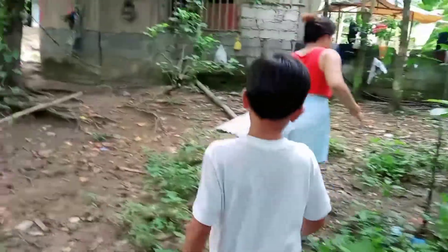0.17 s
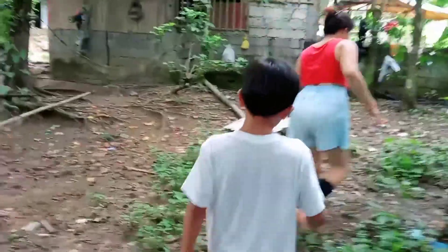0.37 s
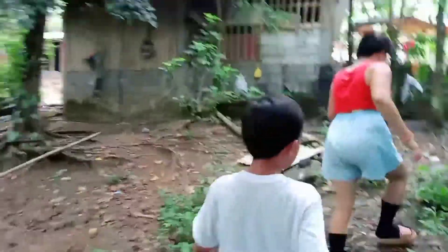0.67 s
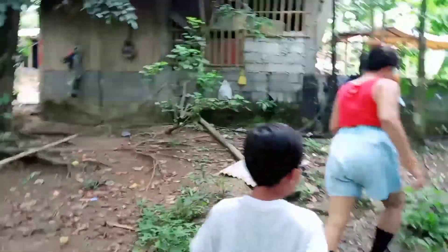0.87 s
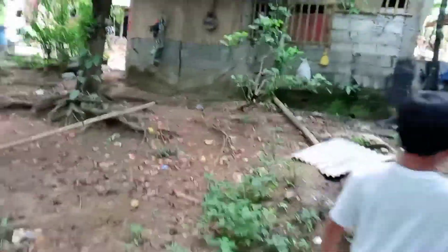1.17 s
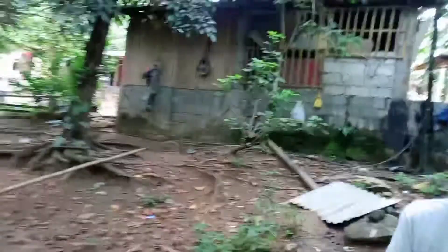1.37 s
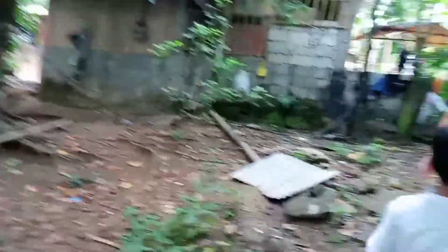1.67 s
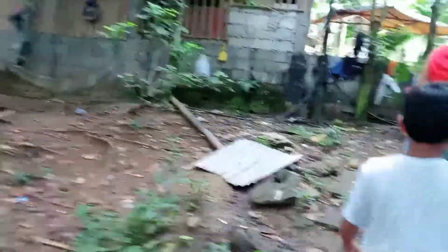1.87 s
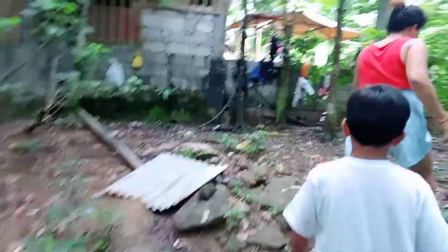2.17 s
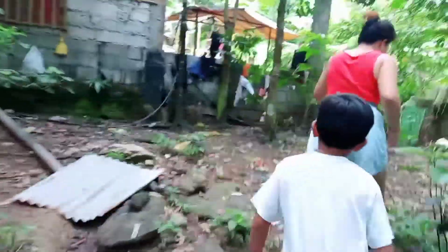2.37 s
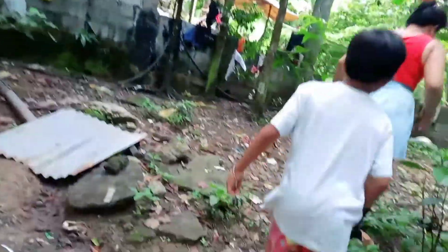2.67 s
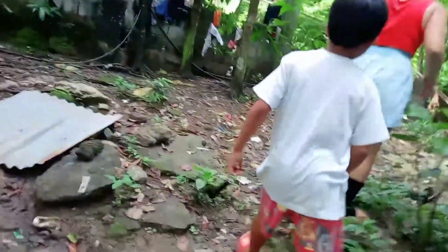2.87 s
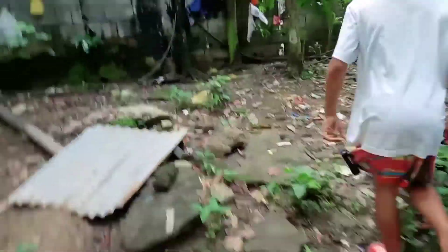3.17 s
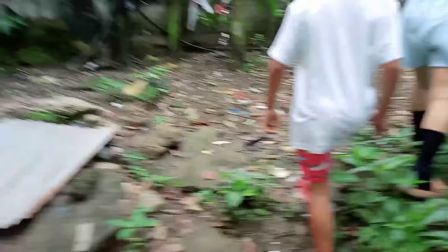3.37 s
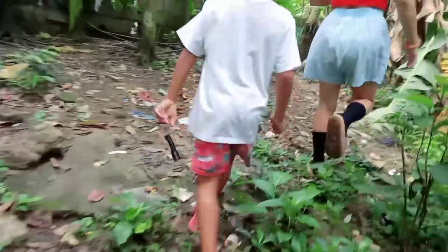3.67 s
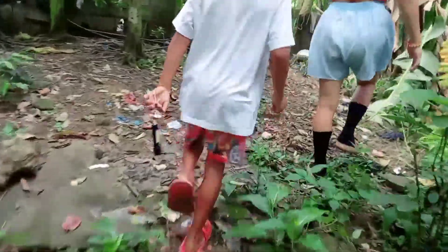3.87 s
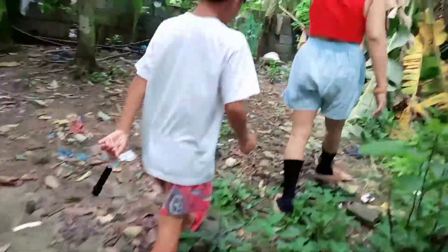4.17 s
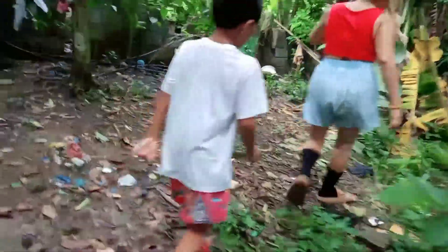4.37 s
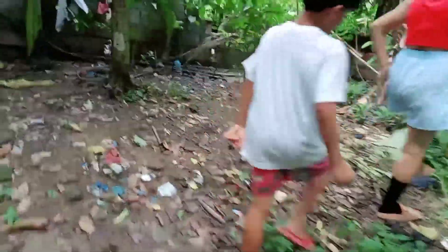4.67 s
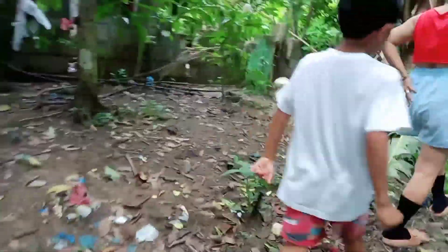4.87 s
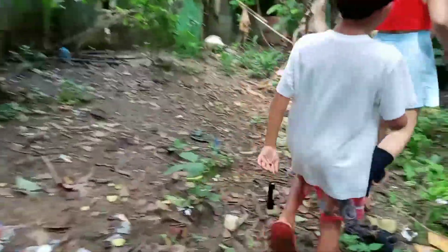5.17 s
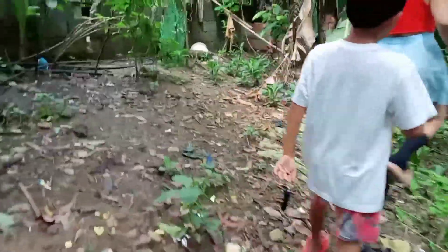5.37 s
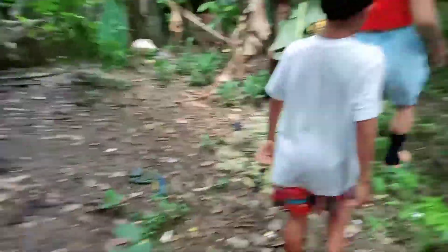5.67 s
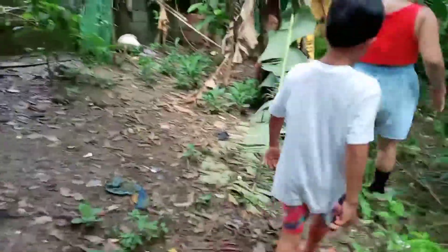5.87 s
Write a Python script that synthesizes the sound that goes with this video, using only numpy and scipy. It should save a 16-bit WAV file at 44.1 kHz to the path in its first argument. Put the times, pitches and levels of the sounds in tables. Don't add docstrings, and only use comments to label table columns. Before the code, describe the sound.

In a leafy rural yard, a close rooster opens with a loud, raspy four-part crow that falls away before two seconds. Feet shuffle through dry leaves, with a sharp twig snap early on. Thin distant fowl whistles follow, then two farther roosters answer, hoarse then clear. Steps and small snaps continue to the end. A handheld, nearly mono microphone adds light hiss.

```python
import sys
import numpy as np
from scipy import signal
from scipy.io import wavfile
from scipy.ndimage import uniform_filter1d

SR = 44100
rng = np.random.default_rng(int(sys.argv[2]) if len(sys.argv) > 2 else 0)


def makeup_ratio(level_db):
    decades = np.asarray(level_db, float) / 20
    return 10 ** decades


def pcm_store(signal):
    levels = np.round(np.clip(np.atleast_2d(signal), -1, 1) * 32767)
    wavfile.write(sys.argv[1], SR, levels.astype(np.int16).T)


N = 264820


def evened(x):
    return x / np.sqrt(np.mean(x ** 2) + 1e-20)


def curve(rows):
    s, *columns = np.transpose(rows)
    return [np.interp(np.arange(N) / SR, s, c) for c in columns]


def read(points, hz):
    f, value = np.transpose(points)
    return np.interp(np.log(hz + 1), np.log(f + 1), value)


def drift(length, hz):
    low_pass = signal.butter(2, hz, fs=SR, output="sos")
    settled = signal.sosfilt(low_pass, rng.standard_normal(length + 4000))[4000:]
    return evened(settled)


def resonate(x, hz, width_hz):
    turn = np.exp(2j * np.pi * np.cumsum(hz * np.ones(len(x))) / SR)
    r = np.exp(-np.pi * width_hz / SR)
    return 2 * (turn * signal.lfilter([(1 - r) ** 2], [1, -2 * r, r * r], x / turn)).real


def noise(points, patchy_db):
    hz = np.fft.rfftfreq(1024, 1 / SR)
    a, b, patches = rng.standard_normal((N // 256 + 5, 513, 3)).T
    patches = uniform_filter1d(uniform_filter1d(patches, 14, 0), 14, 1)
    level_db = read(points, hz)[:, None] + patchy_db * evened(patches)
    return evened(signal.istft((a + 1j * b) * makeup_ratio(level_db), nperseg=1024, noverlap=768)[1][:N])


def add(mix, s, sound):
    part = mix[round(s * SR):][:len(sound)]
    part += sound[:len(part)]


def call(rows, orders, wobble, flutter_db):
    s, *columns = np.transpose(rows)
    t = np.arange(s[0], s[-1], 1 / SR)
    hz, *levels_db = (np.interp(t, s, c) for c in columns)
    turns = np.cumsum(hz * (1 + wobble * drift(len(t), 44.0))) / SR
    tone = np.zeros(len(t))
    for order, db in zip(orders, levels_db):
        tone += makeup_ratio(db + flutter_db * drift(len(t), 60.4)) * np.cos(2 * np.pi * order * turns)
    return s[0], np.sqrt(2) * tone * signal.windows.tukey(len(t), .1)


def with_partial(rows, db):
    return np.column_stack([rows, np.array(rows)[:, -1] + db])


def sung(rows, pitch):
    s = np.linspace(rows[0][0], rows[-1][0], num=80)
    at, *levels_db = np.transpose(rows)
    return np.transpose([s, np.interp(s, *np.transpose(pitch))] + [np.interp(s, at, db) for db in levels_db])


def note(start, length, first_hz, last_hz, db, shape):
    attack_s, release_s, ends_db = shape
    u = np.linspace(0, 1, num=40)
    s, hz = start + length * u, first_hz + (last_hz - first_hz) * u
    swell = np.clip(np.minimum((s - start) / attack_s, (start + length - s) / release_s), 0, 1)
    return np.transpose([s, hz, db + ends_db * (1 - swell)])


# t/s, level/dB, beak opening 0-1
CROW = [
    [(0, -35, 1), (.026, -34.5, 1), (.04, -71, 0.9), (.068, -66, .5)],
    [(.074, -38.5, 0), (.108, -30, 0.3), (.198, -31.5, 0.73), (.262, -44, 0.9)],
    [(.272, -33, 0.36), (.34, -25, 0.3), (.398, -27.5, 1), (.46, -24.5, 0.63), (.53, -24.5, 0.75),
     (.6, -26, 0.85), (.655, -37, 1), (.765, -53.5, 1)],
    [(.778, -47, 0.3), (.809, -32.5, 0.6), (.885, -27.5, 0.2), (.93, -27.5, 0.38), (1.05, -26.5, 0.54),
     (1.15, -29, 0.44), (1.27, -32, 0.62), (1.345, -28.5, 0.26)],
    [(1.36, -36, 0.9), (1.45, -40, 0.1), (1.525, -47, 0), (1.563, -39, 0.3), (1.593, -41.5, 0.8),
     (1.625, -37.5, 0.7), (1.69, -43.5, 0), (1.76, -53, 0.1), (1.82, -50, .6)],
]
# t/s, f/Hz
BEAK_HZ = [(0, 3160), (.1, 3270), (.26, 3350), (.33, 3220), (.47, 3360), (.62, 3305), (.82, 3110),
           (1.0, 3200), (1.2, 3150), (1.36, 3195), (1.7, 3250)]
# f/beak resonance, width/Hz, level/dB
LOW_THROAT = [(767, 223, 13), (1022, 460, 8), (572, 60, -8)]
MID_THROAT = [(1620, 320, -1), (2004, 295, 4.5)]
HIGH_THROAT = [(1, 140, 12), (1.0, 534, 8.5), (2.03, 447, -2.5), (1.87, 250, -9), (2.12, 250, -8.5),
               (2.45, 645, -7.5), (3.2, 1620, -6)]
# t/s, f/Hz
LOWER_HZ = [(.07, 753), (.26, 738), (.275, 752), (.645, 752), (.8, 738), (.94, 728), (1.36, 712)]
UPPER_HZ = [(.09, 941), (.27, 929), (.3, 955), (.53, 972), (.58, 995), (.64, 990), (.79, 970), (.97, 962),
            (1, 985), (1.19, 985), (1.35, 940)]
LOCKED_HZ = [(1.34, 340), (1.45, 336), (1.55, 329), (1.62, 322), (1.7, 305), (1.78, 294)]
CHEST_DB, THROAT_DB, BEAK_DB = -4.5, -1.5, -15
OPEN_CHEST_DB, OPEN_BEAK_DB = -3.5, 10.5
RASP_DB, CLEARING_DB = -3, -1.5
LOCK_S, LOCK_LENGTH_S, LOCK_BLEND_S = 1.36, .425, .08


def rasp():
    effort_db, opening = curve(sum(CROW, []))
    chest_db = CHEST_DB + OPEN_CHEST_DB * (opening - .5)
    shrill_db = BEAK_DB + OPEN_BEAK_DB * (opening - .5)
    t = np.arange(N) / SR
    locked = np.clip((t - LOCK_S) / LOCK_BLEND_S + .5, 0, 1)
    trains = []
    for pitch, order in ((LOWER_HZ, 2), (UPPER_HZ, 3)):
        hz = locked * order * curve(LOCKED_HZ)[0] + (1 - locked) * curve(pitch)[0]
        turns = np.cumsum(hz * (1 + .065 * drift(N, 150))) / SR
        trains.append(np.exp(2.0 * np.cos(2 * np.pi * turns)))
    turbulence = .85 + .8 * rng.standard_normal(N)
    drive = evened(trains[0] * trains[1]) * turbulence
    out, clearing_db = np.zeros(N), CLEARING_DB * locked
    regions = ((LOW_THROAT, 1, chest_db + clearing_db), (MID_THROAT, 1, THROAT_DB + clearing_db),
               (HIGH_THROAT, curve(BEAK_HZ)[0], shrill_db))
    for throat, unit_hz, db in regions:
        ring = np.zeros(N)
        for k, (f, width_hz, top_db) in enumerate(throat):
            ring += (-1) ** k * makeup_ratio(top_db) * evened(resonate(drive, f * unit_hz, width_hz))
        out += makeup_ratio(db) * evened(ring)
    breath_end = np.clip((LOCK_S + LOCK_LENGTH_S - t) / 0.017, 0, 1)
    return makeup_ratio(effort_db + RASP_DB) * out * breath_end


# t/s, level/dB
LOWER = [
    [(.07, -41), (.085, -37), (.13, -56), (.19, -30.5), (.225, -50), (.26, -39)],
    [(.275, -54), (.33, -33.5), (.39, -33), (.44, -50), (.47, -37), (.53, -22.5), (.56, -29.5), (.62, -43),
     (.645, -58)],
    [(.8, -70), (.83, -36), (.875, -30.5), (.93, -27.5), (.97, -34.5), (1.06, -33), (1.2, -41), (1.3, -40),
     (1.345, -29), (1.37, -43)],
]
# t/s, partial 1 level/dB, partial 2 level/dB
UPPER = [
    [(.09, -55, -43), (.115, -33.5, -26.5), (.14, -25.5, -30), (.19, -28.5, -21.5), (.22, -24, -34),
     (.24, -37, -25), (.27, -41, -39)],
    [(.3, -33, -30), (.35, -40, -34.5), (.39, -26, -23), (.435, -22, -24), (.455, -41, -22.5),
     (.53, -27, -29), (.555, -57, -30), (.58, -33, -19), (.64, -43, -63)],
    [(.79, -43, -51), (.81, -47, -28.5), (.86, -37, -36), (.92, -35, -38), (.95, -57, -47), (.98, -40, -53),
     (1.01, -32.5, -33), (1.1, -42.5, -57), (1.19, -50, -54)],
]
# t/s, partials 2, 4, 5 level/dB
LOCKED = [(1.34, -43, -43, -44), (1.385, -35.5, -39.5, -42), (1.45, -32, -37.5, -39.5),
          (1.525, -48, -45.5, -47.5), (1.56, -32, -37.5, -41), (1.59, -46.5, -43, -48),
          (1.625, -31, -41.5, -41), (1.69, -46, -45, -54), (1.78, -64, -66, -68)]
# t/s, partials 9, 10, 17, 19, 21 level/dB
SHRILL = [(1.35, -66, -66, -78, -72, -84), (1.39, -58, -64, -69, -63, -82), (1.45, -60, -62, -72, -63, -80),
          (1.5, -60, -60, -72, -72, -71), (1.56, -68, -58, -68, -80, -68), (1.62, -70, -57, -80, -80, -73),
          (1.7, -76, -68, -86, -86, -84)]
# t/s, level/dB
MIXED = [(.82, -35), (.9, -35), (1.0, -41), (1.09, -37), (1.11, -39.5), (1.21, -32), (1.26, -37),
         (1.3, -43.5), (1.36, -33)]
# t/s, f/Hz
MIXED_HZ = [(.82, 1636), (1.09, 1630), (1.11, 1563), (1.36, 1590)]
# t/s, depth 0-1
GROWL = [(0, .1), (.8, .1), (.95, .4), (1.12, .35), (1.2, .75), (1.27, .7), (1.36, .2)]
GROWL_HZ = 68
CLEAR_DB, OCTAVE_DB, SEVENTH_DB = -2, -29.5, -12.5


def near_rooster():
    clear, rough = np.zeros(N), rasp()
    for rows, flutter_db in zip(LOWER, (2, 2, 4.5)):
        rows = sung(with_partial(rows, OCTAVE_DB), LOWER_HZ)
        add(clear, *call(rows, orders=(1, 2), wobble=.009, flutter_db=flutter_db))
    for rows, wobble, weak_db in zip(UPPER, (.003, .005, .009), (-30, -34, -50)):
        rows = sung(with_partial(rows, weak_db), UPPER_HZ)
        add(clear, *call(rows, orders=(1, 2, 4), wobble=wobble, flutter_db=2))
    locked = sung(with_partial(LOCKED, SEVENTH_DB), LOCKED_HZ)
    add(clear, *call(locked, orders=(2, 4, 5, 7), wobble=.007, flutter_db=3.2))
    shrill = sung(SHRILL, LOCKED_HZ)
    add(clear, *call(shrill, orders=(9, 10, 17, 19, 21), wobble=.006, flutter_db=5))
    mixed = sung(with_partial(MIXED, OCTAVE_DB), MIXED_HZ)
    add(rough, *call(mixed, orders=(1, 2), wobble=.013, flutter_db=4))
    beat = np.cos(2 * np.pi * np.cumsum(GROWL_HZ * (1 + 0.15 * drift(N, 24))) / SR)
    return makeup_ratio(CLEAR_DB) * clear, rough * (1 + np.clip(curve(GROWL)[0], 0, 1) * beat)


def blurred(s, length, hz, db, width_hz):
    rows = note(s, length, hz, hz * 0.96466, db, (0.039, 0.1, -9))
    s, hz, db = np.transpose(rows)
    t = np.arange(s[0], s[-1], 1 / SR)
    blur = evened(resonate(rng.standard_normal(len(t)), np.interp(t, s, hz), width_hz))
    return s[0], makeup_ratio(np.interp(t, s, db)) * blur * signal.windows.tukey(len(t), .15)


# start t/s, length t/s, centre f/Hz, level/dB
PEEPS = [(0.279, 0.35, 1250, -48), (0.77, 0.29, 1060, -45.5), (0.846, 0.14, 2520, -52),
         (2.043, 0.16, 2030, -63), (3.1, 0.26, 1980, -60.5), (5.245, 0.1, 1990, -58.5),
         (4.9, 0.19, 1950, -59.5), (0, 0.061, 1110, -45), (2.75, 0.19, 3140, -60.5),
         (2.96, 0.21, 3173, -61), (3.347, 0.14, 3150, -63), (3.55, 0.16, 3200, -63),
         (4.032, 0.12, 2900, -67.5), (4.615, 0.21, 2960, -64), (5.79, 0.06, 3580, -65)]


def chicks():
    out = np.zeros(N)
    for row in PEEPS:
        add(out, *blurred(*row, width_hz=280))
    return out


# start t/s, hold t/s, leaf crackle level/dB, sole scuff level/dB, rumble level/dB
STEPS = [(0, 0.2, -59, -50, -55), (0.328, 0.1744, -69, -76, -65), (0.594, 0.0081, -48, -71, -59),
         (0.974, 0.23, -61, -69, -58.5), (1.514, 0.14, -57.5, -53, -55), (1.743, 0.13, -69, -62, -83),
         (2.03, 0.22, -61.5, -76, -64), (2.359, 0.031, -66, -76, -66), (2.56, 0.058, -62.5, -72, -61),
         (2.755, 0.021, -64, -58, -67), (2.995, 0.14, -61.5, -59.5, -57.5), (3.138, .14, -57, -57.5, -60),
         (3.34, 0.2, -64.5, -58, -64.5), (3.625, 0.011, -54, -53, -65), (3.692, 0.25, -59.5, -57.5, -60.5),
         (4.01, 0.11, -91, -64, -74), (4.233, 0.078, -59, -59.5, -71), (4.36, 0.11, -62.5, -74, -64),
         (4.88, 0.059, -54.5, -53, -59.5), (4.943, 0.17, -60.5, -65.5, -58.5),
         (5.277, 0.032, -56.5, -69, -69), (5.495, 0.015, -57, -61.5, -61), (5.682, 0.058, -63.5, -81, -62),
         (5.99, .05, -63.5, -63.5, -61.5)]


def tread(column, rise_db_per_s, fall_db_per_s):
    t, rows = np.arange(0, N + 64, 64)[:, None] / SR, np.array(STEPS)
    start, end = rows[:, 0], rows[:, 0] + abs(rows[:, 1])
    rise_db = rise_db_per_s * np.maximum(start - t, 0)
    fall_db = fall_db_per_s * np.maximum(t - end, 0)
    power = makeup_ratio(rows[:, column] - rise_db - fall_db) ** 2
    return np.interp(np.arange(N) / SR, t[:, 0], np.sqrt(power.sum(1)))


def steps():
    sizes = makeup_ratio(1.03 * np.minimum(rng.exponential(1, (N, 2)), 5)) * rng.standard_normal((N, 2))
    leaf, sole = (sizes * (rng.random((N, 2)) < 3500 / SR)).T
    crackle = resonate(leaf, 4290.0, 1900) + 0.71 * resonate(leaf, 6210, 780)
    scuff = resonate(sole, 1614, 500) + 0.56 * resonate(sole, 1124, 1020)
    out = np.zeros(N)
    for column, sound in ((2, crackle), (3, scuff)):
        gain = tread(column, rise_db_per_s=328, fall_db_per_s=166)
        out += gain * makeup_ratio(0.99 * drift(N, 20.0)) * evened(sound)
    return out


# f/Hz, level/dB per Hz
THUD = [(15, -70), (25, -12.5), (47, 5.5), (65, 5.5), (123, -9), (146, -0.5), (291, -14.5), (450, -13.5),
        (580, -15), (990, -120)]
AIR = [(150, -35), (250, 0.5), (516, -2), (689, 3), (1170, -5.5), (1840, -1), (2380, -11.5), (3790, -7),
       (5670, -6.5), (6350, -4.5), (7340, -3.5), (7950, 1.5), (9340, -5.5), (10800, -1), (11700, -10.5),
       (15200, -27.5), (22000, -120)]
AIR_DB, HUM_HZ, HUM_DB, SWAY_DB = -61, 124.1, -74, -77.5


def ground():
    hum = evened(resonate(rng.standard_normal(N), HUM_HZ, 3.9))
    thump = tread(column=4, rise_db_per_s=47, fall_db_per_s=63)
    rumble = (makeup_ratio(SWAY_DB) + thump) * makeup_ratio(2.0 * drift(N, 17.3)) * noise(THUD, patchy_db=2.0)
    return makeup_ratio(AIR_DB + 0.5) * noise(AIR, patchy_db=1.5) + rumble + makeup_ratio(HUM_DB) * hum


# t/s, peak level/dB, ring f/Hz, low knock level/dB
TWIGS = [(0.353, -21, 4070, -9), (0.5832, -20, 4855, -11), (0.5953, -13, 4800, -16), (0.6026, -10, 3100, 6),
         (0.6049, -9, 4600, -29), (1.028, -27, 4044, 1), (1.6112, -27.5, 4400, 1),
         (2.161, -34.5, 4600, -21), (2.596, -34, 3440, -18), (2.845, -31, 3340, -15),
         (3.038, -28, 3800, -7), (3.625, -26.5, 4320, -22), (4.211, -32, 4831, -20),
         (4.342, -34, 4030, -13.5), (4.446, -28, 3860, -25), (4.4646, -42.5, 4018, 10),
         (4.872, -48.5, 4330, 2), (4.964, -41.5, 4200, 8.5), (5.2582, -47.5, 4300, 6),
         (4.868, -39.5, 4800, 9), (4.923, -30.5, 3450, -5), (4.96, -55, 4050, 14), (4.9726, -28, 4400, -27),
         (5.043, -30, 4300, -27), (5.223, -35.5, 4450, -14), (5.262, -38, 4339, -6), (5.32, -36, 4502, -20),
         (5.5002, -38, 4340, 9), (5.5182, -38, 4335, 4), (5.672, -34, 4330, -28), (3.1524, -38, 4300, 2.5),
         (5.708, -38, 4300, -23), (3.6236, -32, 3050, -20), (1.775, -39, 6250, -20), (4.885, -41, 5000, 0),
         (4.942, -47, 4000, -1), (1.56, -44, 2200, -5)]
THIN_DB, THIN_KNOCK_HZ, KNOCK_HZ_PER_DB = -42, 1440, -17
EDGE_DB = -8.5


def twigs():
    out, t = np.zeros(N), np.arange(800) / SR
    fibres = rng.standard_normal((len(TWIGS), len(t))) * makeup_ratio(-60 * t / 0.053)
    fibres[:, 0] = 22
    for burst, (s, peak_db, hz, knock_db) in zip(fibres, TWIGS):
        knock_hz = THIN_KNOCK_HZ + KNOCK_HZ_PER_DB * (peak_db - THIN_DB)
        snap = np.zeros(len(t))
        for f, width_hz, db in ((hz, 1100, 0), (knock_hz, 450, knock_db), (6600, 1200, EDGE_DB)):
            part = resonate(burst, f, width_hz)
            snap += makeup_ratio(db) * part / abs(part).max()
        add(out, s, makeup_ratio(peak_db - 8.5) * snap)
    thin_wood = signal.butter(4, (750, 9000), "band", fs=SR, output="sos")
    return signal.sosfilt(thin_wood, out)


# start t/s, length t/s, centre
# f/Hz, level/dB
WIDE_CHIRPS = [
    (2.52, 0.18, 3270, -62),
    (2.9, .08, 1500, -62),
    (3.1, 0.24, 2970, -59.5),
    (5.83, 0.12, 3280, -63),
    (.596, 0.028, 1250, -44),
]


def wide_chirps():
    out = np.zeros(N)
    for row in WIDE_CHIRPS:
        add(out, *blurred(*row, width_hz=470))
    return out


# start t/s, length t/s, first f/Hz,
# last f/Hz, level/dB
PIPES = [
    (1.968, 0.039, 2040, 2100, -53),
    (2.13, 0.11, 2090, 2270, -59),
    (2.341, 0.2, 2173, 1770, -70),
    (2.53, 0.14, 1780, 1856, -62.5),
    (2.819, 0.098, 1836, 1780, -67),
    (4.654, 0.2, 1650, 1620, -69),
    (5.635, 0.23, 1674, 1670, -68),
    (4.887, 0.05, 677, 690, -47),
]
# start t/s, first f/Hz, last f/Hz, level/dB
ROLL = (1.997, 2080, 2120, -47.5)
ROLL_S, ROLL_HZ, ROLL_FADE_S = .085, 62, .035


def pipes():
    out = np.zeros(N)
    for row in PIPES:
        add(out, *call(note(*row, (0.039, 0.097, -15.5)), orders=(1,), wobble=0.01, flutter_db=4.5))
    rolled = note(ROLL[0], ROLL_S, *ROLL[1:], (.02, .045, -10))
    s, tone = call(rolled, orders=(1,), wobble=.002, flutter_db=.8)
    t = np.arange(len(tone)) / SR
    depth = np.exp(-(t / ROLL_FADE_S) ** 2 / 2)
    add(out, s, tone * (1 - depth * np.cos(2 * np.pi * ROLL_HZ * t)))
    return out


# t/s, f/Hz, partial 1 level/dB, partial 2 level/dB
FAR = [
    [(2.96, 790, -75, -83), (2.975, 766, -87, -59), (3.01, 778, -64, -54.5), (3.056, 787, -55, -46.5),
     (3.094, 781, -56.5, -50), (3.115, 793, -77, -61), (3.14, 760, -78, -74)],
    [(3.49, 772, -76, -62), (3.545, 802, -52.5, -56.5), (3.61, 813, -54, -50.5), (3.65, 876, -53.5, -51.5),
     (3.7, 860, -55.5, -52.5), (3.756, 843, -55, -55), (3.806, 806, -45, -44.5), (3.87, 791.3, -54, -53.5),
     (4.05, 768, -70.5, -67)],
    [(4.1, 782, -69, -72), (4.14, 792, -59.5, -52), (4.268, 781, -49, -47.5), (4.4, 782, -61, -50.5),
     (4.5, 766, -67.5, -46.5), (4.62, 751, -79, -54.5), (4.75, 735, -56, -60), (4.84, 709, -56, -63),
     (4.87, 703, -78, -74)],
]
# t/s, f/Hz, partial 1 level/dB, partial 2 level/dB
THIRD = [
    [(3.28, 1010, -79, -67), (3.298, 934, -60, -63), (3.322, 970, -52, -47), (3.362, 953, -52, -49),
     (3.39, 936, -60, -48.5), (3.432, 953, -57, -55), (3.474, 964, -80, -61), (3.525, 960, -78, -62),
     (3.55, 952.5, -78, -71)],
    [(4.24, 920, -70, -82), (4.254, 1007, -73, -61), (4.278, 990, -91, -45.5), (4.364, 986, -80, -55),
     (4.374, 982, -79, -80), (4.388, 980, -89, -52.5), (4.5, 974.8, -82, -50), (4.506, 972.5, -88, -41.5),
     (4.63, 982.2, -89, -99)],
]
TRILL_DEPTHS = (.1, .5, .3, 0)
TRILL_HZ, TRILL_PEAK_S, FAR_OCTAVE_DB = 34.5, 3.72, -26


def far_roosters():
    out = np.zeros(N)
    wobbles, flutters_db = (.006, .01, .02, .001), (2.5, 1.5, 3, .8)
    for rows, wobble, flutter_db, depth in zip(FAR[:2] + THIRD, wobbles, flutters_db, TRILL_DEPTHS):
        rows = with_partial(rows, FAR_OCTAVE_DB)
        s, tone = call(rows, orders=(1, 2, 4), wobble=wobble, flutter_db=flutter_db)
        t = s + np.arange(len(tone)) / SR
        add(out, s, tone * (1 + depth * np.cos(2 * np.pi * TRILL_HZ * (t - TRILL_PEAK_S))))
    return out


THROB_HZ, THROB_PEAK_S, THROB_DEPTH = 16.4, 4.196, .45


def long_note():
    rows, calm, upper = with_partial(FAR[2], FAR_OCTAVE_DB), np.zeros(N), np.zeros(N)
    add(calm, *call(rows[:, :3], orders=(1,), wobble=.0012, flutter_db=1))
    add(upper, *call(rows[:, [0, 1, 3, 4]], orders=(2, 4), wobble=.001, flutter_db=1.8))
    throb = np.cos(2 * np.pi * THROB_HZ * (np.arange(N) / SR - THROB_PEAK_S))
    return calm + upper * (1 + THROB_DEPTH * throb)


# f/Hz, t60 t/s
YARD = [(400, 0.14), (1500, 0.39), (4000, 0.11), (10000, 0.25)]


def yard(x):
    taps = np.zeros(SR // 2)
    at = np.arange(300, len(taps) - 20, 20)
    taps[at + rng.integers(0, 20, len(at))] = rng.choice([-1., 1.], len(at))
    hz, t, z = signal.stft(taps, SR, nperseg=256)
    tail = signal.istft(z * makeup_ratio(-60 * t / read(YARD, hz)[:, None]), SR, nperseg=256)[1]
    return signal.fftconvolve(x, tail / np.linalg.norm(tail))[:N]


def scene():
    clear, rough = near_rooster()
    far = chicks() + wide_chirps() + pipes() + far_roosters()
    held, snaps = long_note(), twigs()
    mix = makeup_ratio(-4.0) * rough + makeup_ratio(-2.5) * clear + makeup_ratio(1.5) * far + makeup_ratio(1.5) * held
    mix += snaps + steps() + ground()
    mix += yard(makeup_ratio(-8.5) * rough + makeup_ratio(-14) * clear + makeup_ratio(-12.5) * snaps)
    mix += yard(makeup_ratio(-5.5) * far + makeup_ratio(-10) * held)
    return np.array([mix, mix])


def top_cut(x):
    return signal.sosfilt(signal.butter(12, 15500, fs=SR, output="sos"), x)


# f/Hz, level/dB per Hz
TOP = [(6880, -62.5), (11700, -5), (12100, -16), (14900, -1), (15500, -14.5)]
PORTS = [(24, -41), (40, -5), (183, -17), (417, -18.5), (778, -3.5), (1100, -11), (1280, -20), (2110, -13),
         (2710, -22), (3220, -1), (4030, -8), (10700, -2.5), (15500, -21)]
TOP_DB, PORTS_DB = -75, -71


def record(dry):
    hiss = makeup_ratio(TOP_DB) * noise(TOP, patchy_db=.7)
    unlike = makeup_ratio(PORTS_DB) * noise(PORTS, patchy_db=5)
    capsule = signal.butter(3, 45, "high", fs=SR, output="sos")
    dry = signal.sosfilt(capsule, dry)
    dry = .3 * np.tanh(dry / .3)
    return top_cut(dry + hiss + np.array([unlike, -unlike]))


dry = scene()
out = record(dry)
pcm_store(out)
```